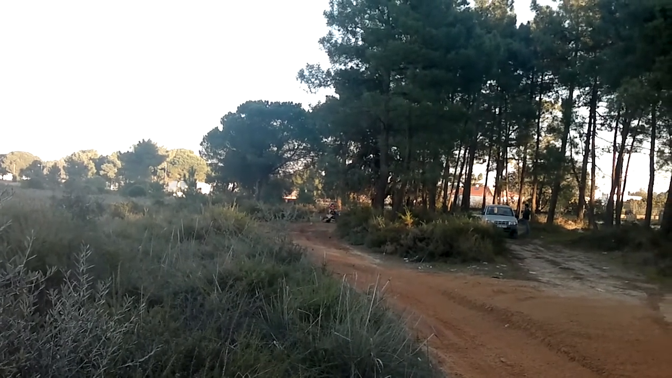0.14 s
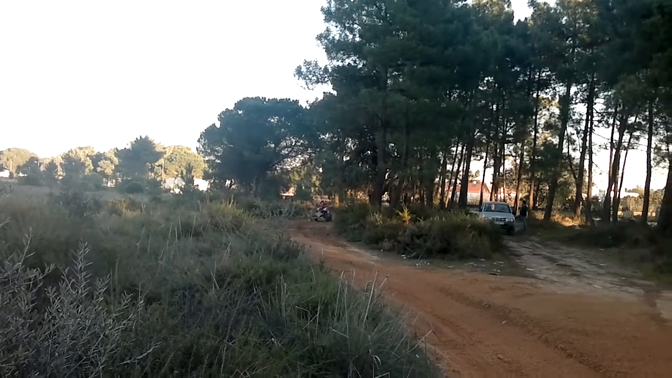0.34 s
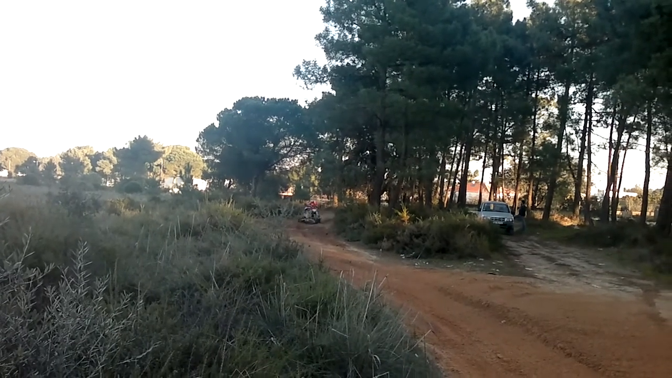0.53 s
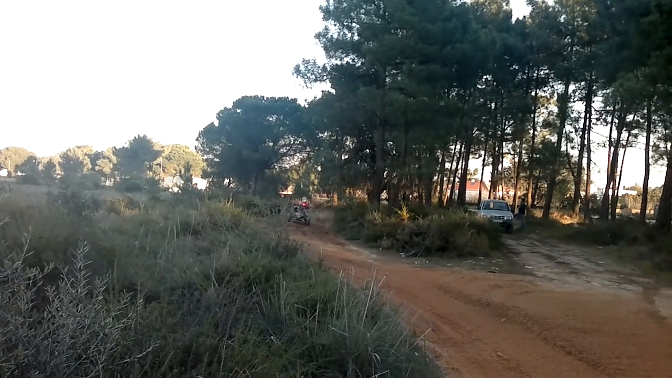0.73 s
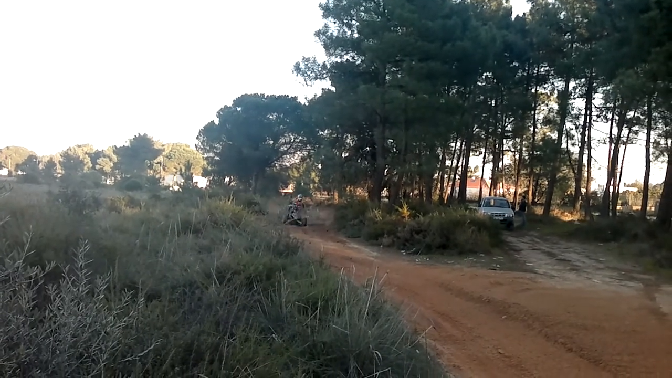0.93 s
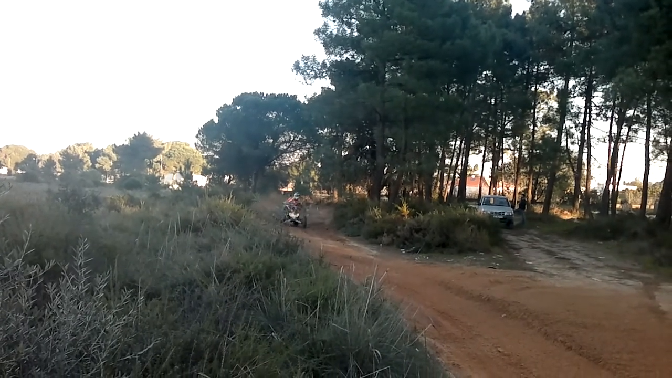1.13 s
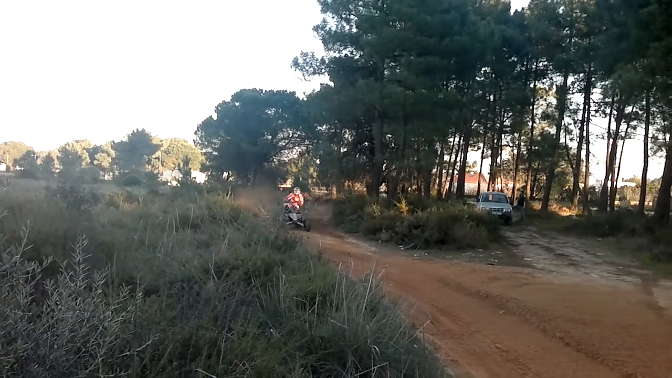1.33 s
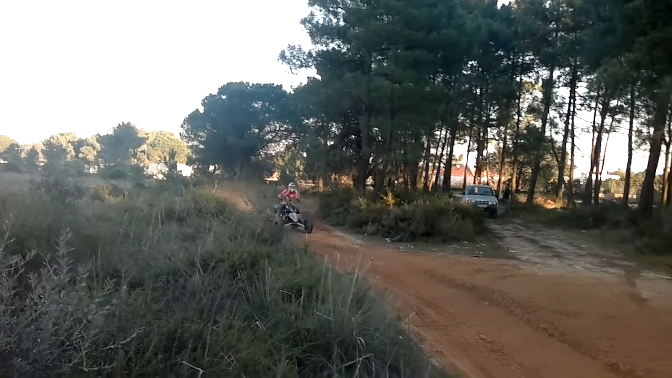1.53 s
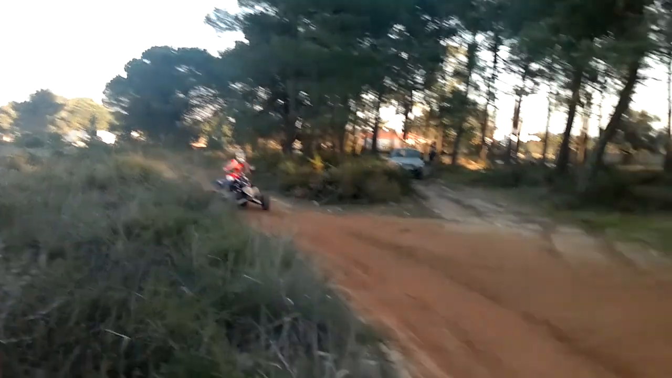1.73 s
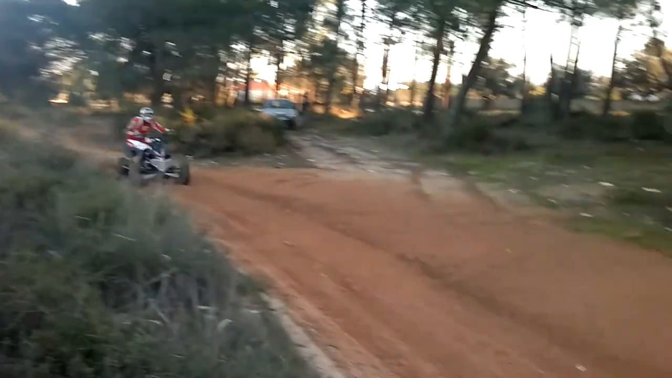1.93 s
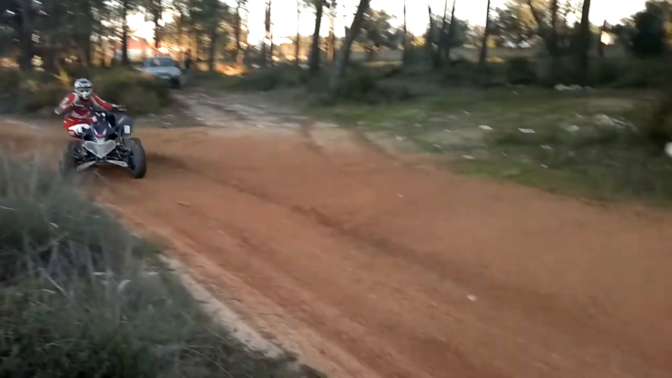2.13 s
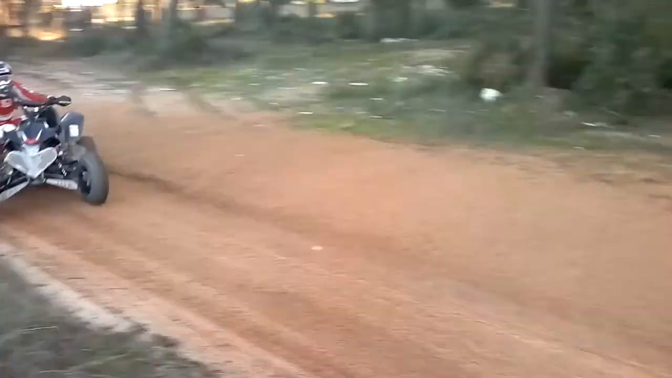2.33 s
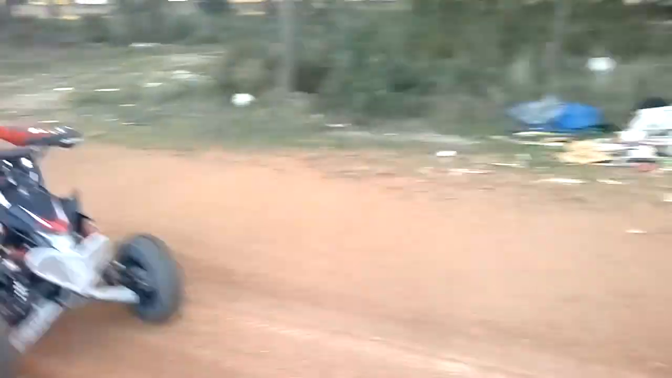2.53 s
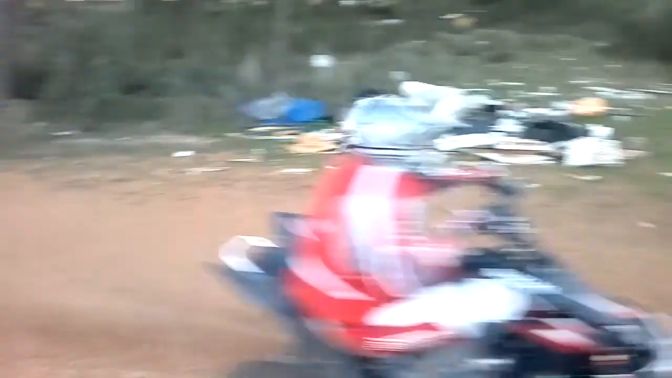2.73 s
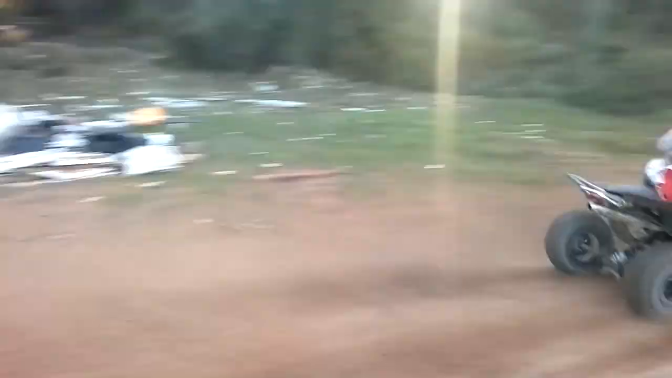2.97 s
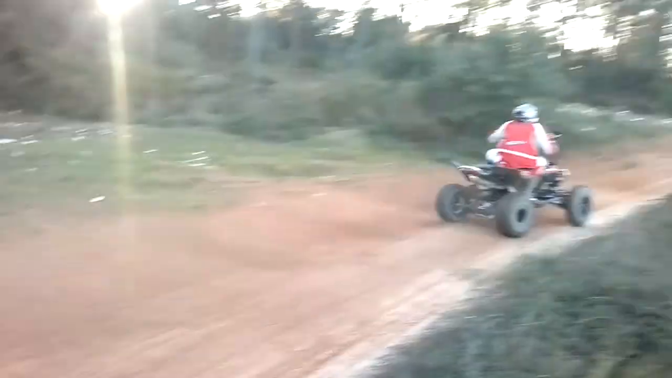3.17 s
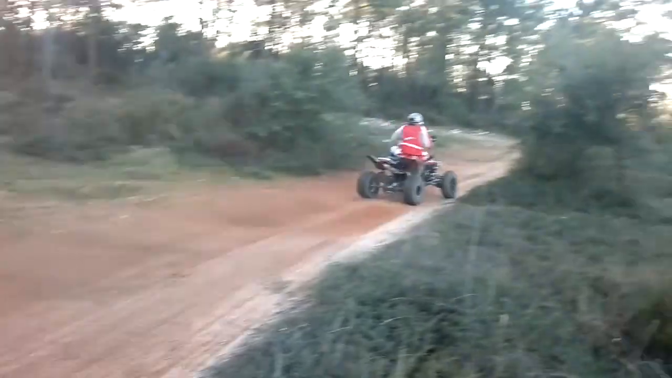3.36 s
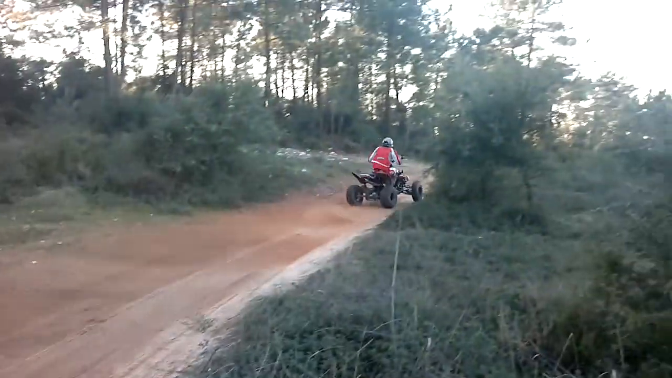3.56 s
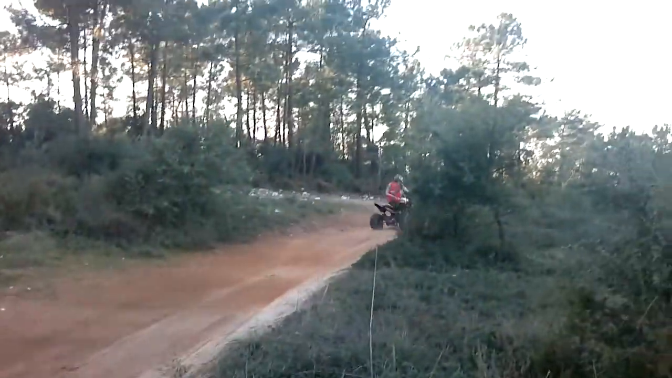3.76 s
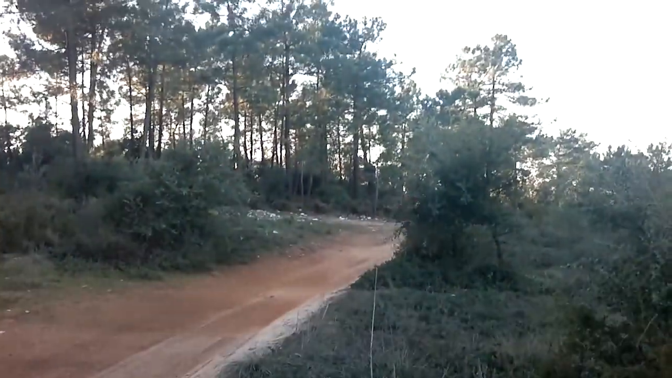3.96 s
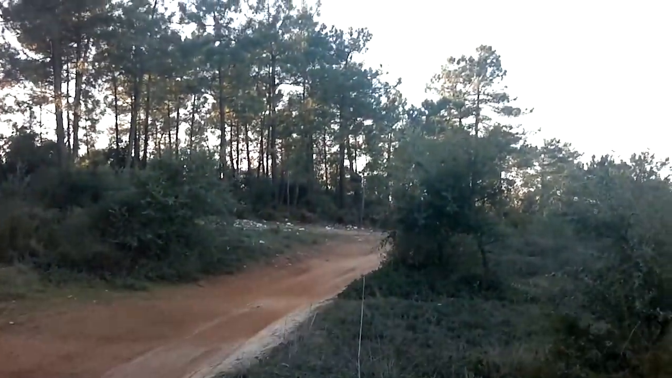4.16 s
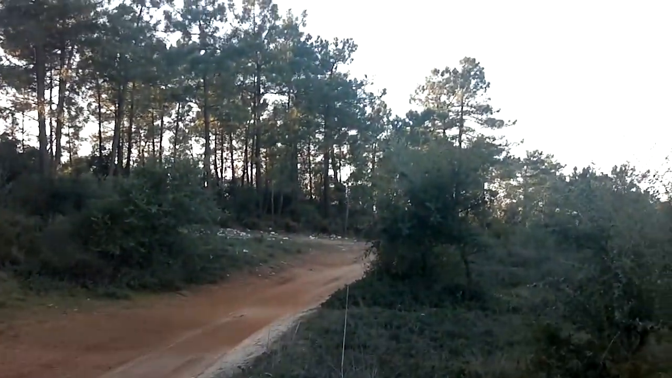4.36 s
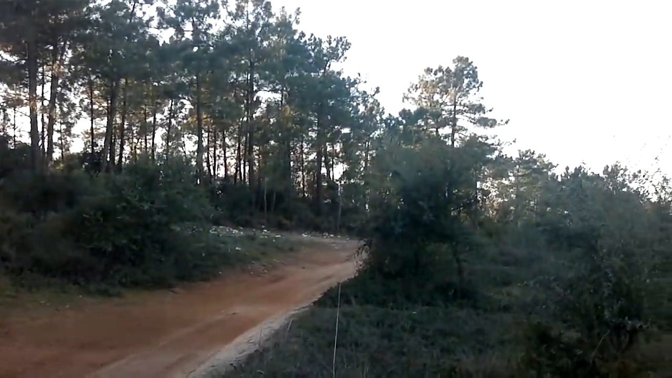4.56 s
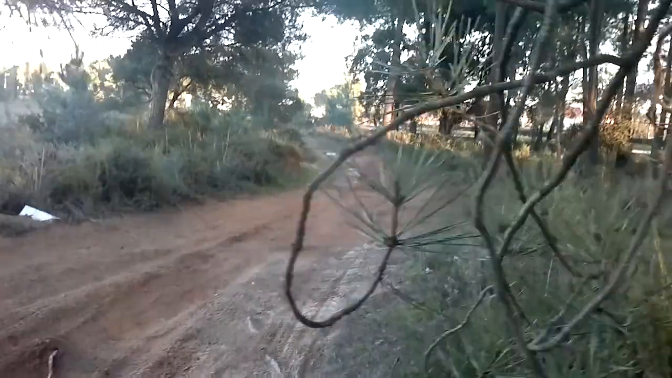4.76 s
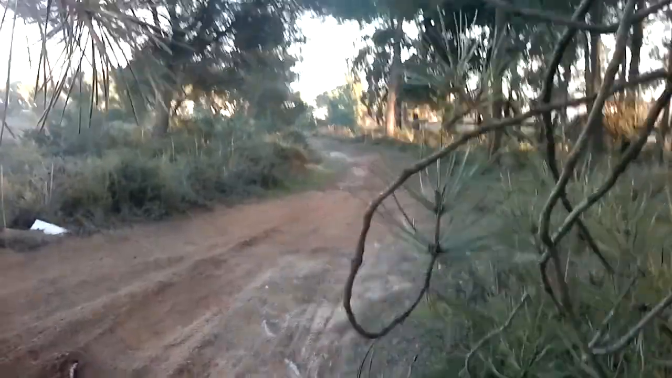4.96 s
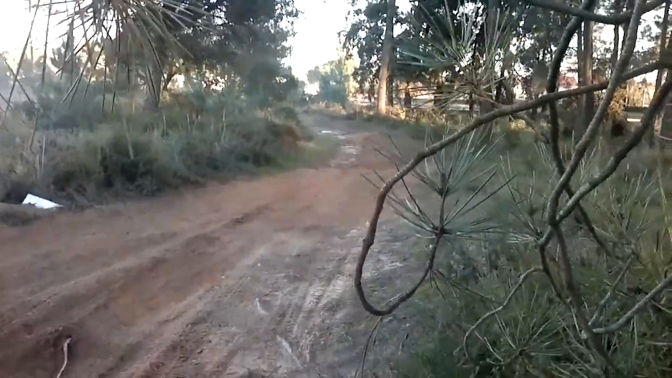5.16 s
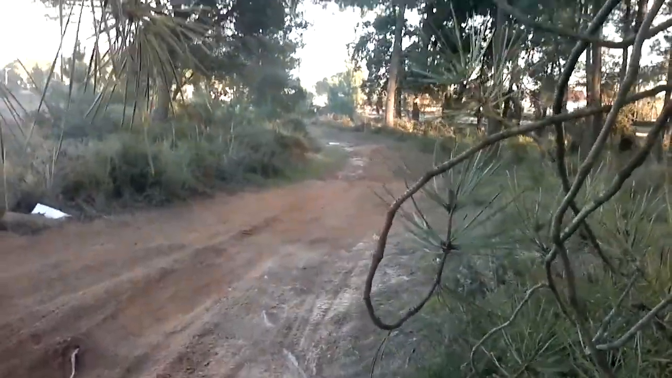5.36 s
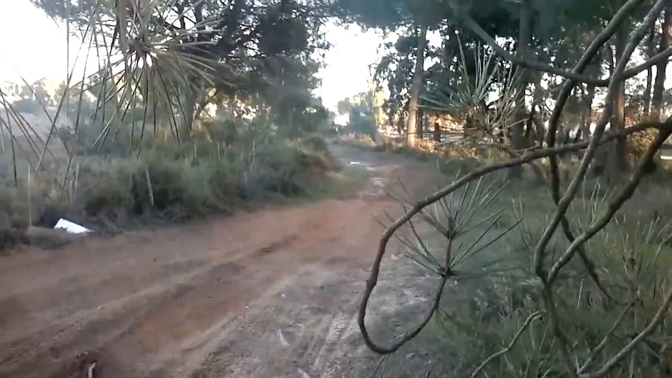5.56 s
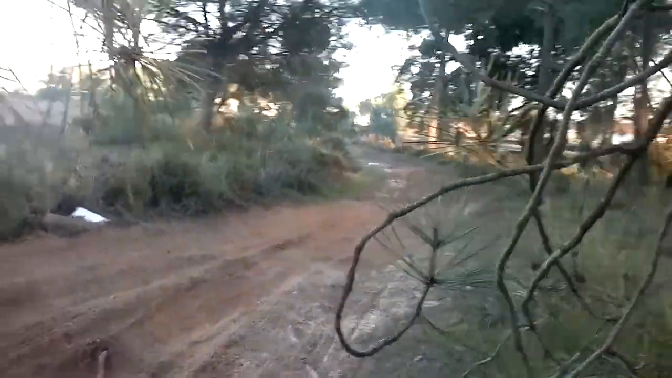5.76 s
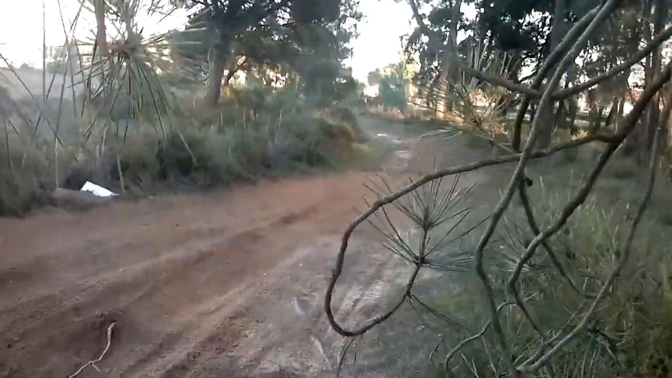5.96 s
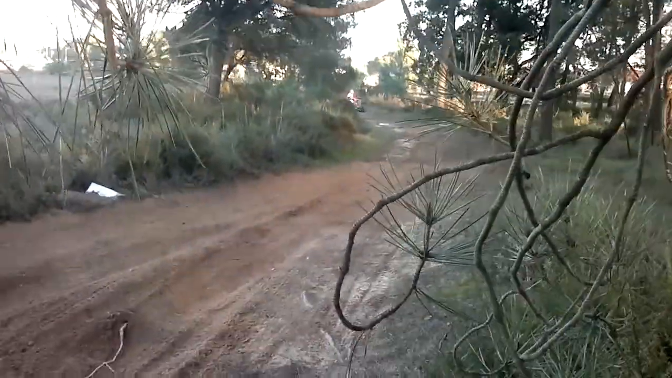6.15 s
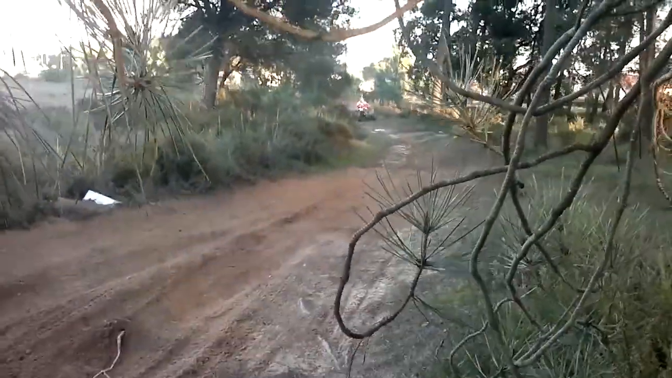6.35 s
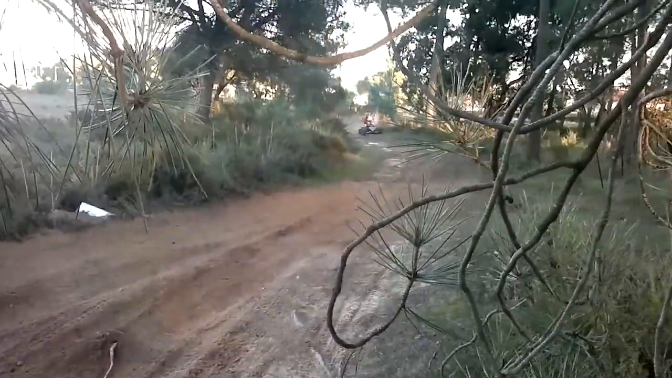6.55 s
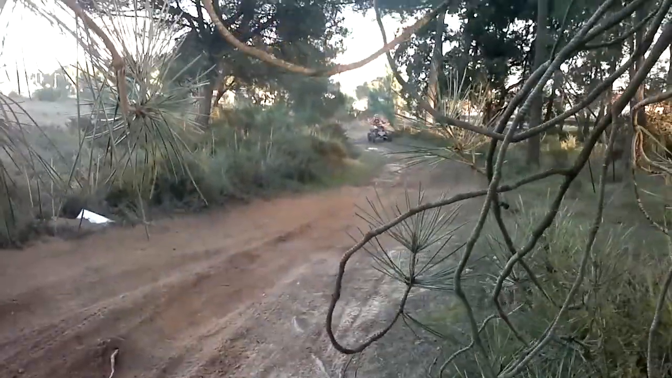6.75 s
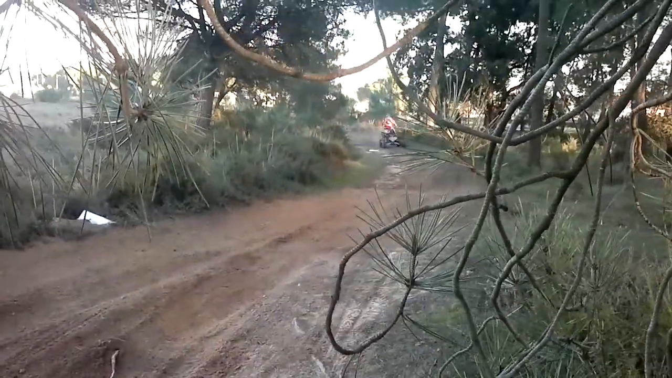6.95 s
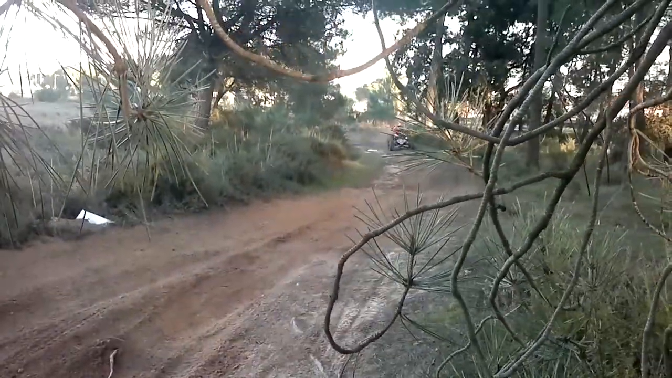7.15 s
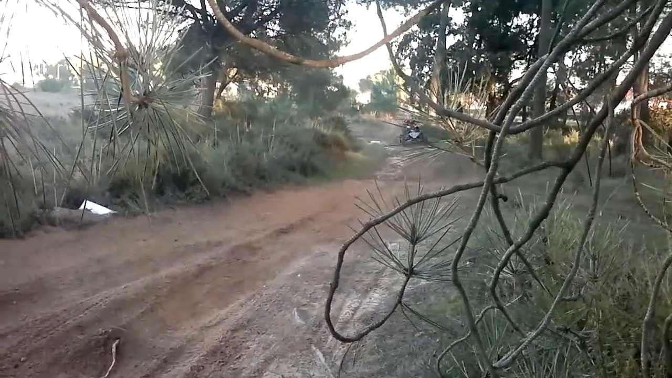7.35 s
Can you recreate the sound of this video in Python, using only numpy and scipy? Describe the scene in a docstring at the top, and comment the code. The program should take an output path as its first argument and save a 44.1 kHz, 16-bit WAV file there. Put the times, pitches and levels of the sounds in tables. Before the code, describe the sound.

A sport quad's low, fast engine buzz comes up a track among trees, barking and rasping harder as it nears. The close pass is very loud, with ripping exhaust pops, clatter and low gusts thumping the handheld microphone. It rides away, duller behind a bush, with one last crackle. Sound drops out for an instant; then the quad returns, coasting hollowly and blipping its throttle, while twigs tick faintly nearby.

```python
"""A booming, rasping single-cylinder sport quad comes up a dirt track, passes under two metres away and rides off.
From the front, clean low orders, barks at each firing and pulsing noise make the boom, bark and rasp.
From behind, hard pops ring the exhaust pipe, buffet the two microphone ports and overload them softly.
After a short silence it approaches again, on and off the throttle, while twigs tick close by the left port."""
import sys
import numpy as np
from scipy import signal
from scipy.fft import rfft, irfft
from scipy.io import wavfile
from scipy.ndimage import uniform_filter1d, map_coordinates

SR = 44100
rng = np.random.default_rng(int(sys.argv[2]) if len(sys.argv) > 2 else 0)


def pcm_store(signal):
    """Save signal as 16-bit PCM."""
    levels = np.round(np.clip(np.atleast_2d(signal), -1, 1) * 32767)
    wavfile.write(sys.argv[1], SR, levels.astype(np.int16).T)


N = 330309
T = np.arange(N) / SR  # time (s)

# Engine speed on the first approach, riding away and on the second approach.
# Each row: time in seconds, firings a second.
FIRST_SPEED = [(0.0, 71.9), (0.05, 72.8), (0.08, 70.7), (0.14, 63.6), (0.22, 57.6), (0.28, 53.3),
               (0.28, 53.3), (0.33, 57.6), (0.48, 73.0), (0.5, 74.6), (0.58, 69.5), (0.7, 76.6),
               (0.72, 76.1), (0.76, 74.8), (1.05, 71.7), (1.18, 80.8), (1.19, 80.3), (1.27, 71.0),
               (1.28, 71.1), (1.35, 76.2), (1.38, 77.0), (1.48, 76.6), (1.55, 75.3), (1.64, 76.3),
               (1.91, 69.9), (2.07, 73.7), (2.19, 81.3), (2.26, 79.6), (2.52, 71.7), (2.76, 73.4)]
AWAY_SPEED = [(2.66, 65.56), (2.74, 76.27), (2.92, 70.23), (3.27, 65.79), (3.45, 68.36), (3.68, 68.2),
              (3.8, 72.61), (3.92, 68.85), (3.98, 59.69), (4.08, 62.6), (4.12, 53.56), (4.57, 54.65),
              (4.63, 59.84), (4.72, 53.32)]
SECOND_SPEED = [(4.95, 76.42), (5.1, 74.95), (5.19, 76.55), (5.4, 58.3), (5.68, 57.53), (5.87, 64.28),
                (6.06, 59.88), (6.2, 52.68), (6.36, 48.77), (6.6, 49.8), (6.69, 60.04), (6.85, 50.24),
                (7.12, 81.05), (7.2, 68.99), (7.33, 59.36), (7.4, 64.97), (7.49, 56.05)]
# Twists of the throttle. Each row: opened in seconds, shut in seconds, opening 0-1.
THROTTLE = [(-.2, 0.13, 0.94), (.335, 3.945, 1), (4.092, 4.712, 1), (4.8, 5.22, 0.99), (5.72, 6.04, 0.4),
            (6.615, 6.72, 1), (6.85, 7.54, 0.6)]
# Full-throttle levels of each approach, before its overall trims. Each row: time in seconds, boom in dB,
# upper orders relative to it in dB, bark in dB, rasp in dB.
FIRST_LEVELS = [(0, -17, -2, -23, -23), (1.0, -14.5, -1, -27.5, -22.5), (1.55, -15.5, 0, -24, -22.5),
                (1.9, -14, -0.5, -22, -21), (2.22, -12, 3.5, -22, -22.5), (2.5, -16.5, 12, -21, -25.5),
                (2.74, -13, 2, -17.5, -21)]
SECOND_LEVELS = [(4.95, -11, -19, -28, -31), (5.199, -14, -16, -28.5, -32), (5.55, -16, -18, -29.5, -31),
                 (5.9, -17, -9, -29, -37), (6.11, -18.5, -6, -29.5, -39), (6.15, -12.5, -5.5, -32.5, -37.5),
                 (6.6, -12.5, -2.5, -34, -41.5), (6.66, -17, -0.5, -28.5, -42),
                 (7.04, -12.5, 3, -24, -30.5), (7.17, -10, 3, -23, -26), (7.24, -17, 5.5, -23, -26),
                 (7.31, -12.5, 4.5, -23.5, -26.5), (7.49, -13.5, 4, -22.5, -26.5)]
# Colours of the exhaust bark, far then nearer, and of the engine's rasp. Each row: frequency in Hz, gain in dB.
FIRST_FAR_BARK = [(220, -48), (380, -5.5), (500, -0.5), (650, 3), (730, -14), (776, -22), (918, -5),
                  (1190, -2.5), (1440, 0.5), (1900, -19), (2470, -51), (4180, -120)]
FIRST_NEAR_BARK = [(220, -35), (380, -1), (404, -13), (643, 3), (697, -10.5), (1180, -1.5), (1470, -13),
                   (1690, -20), (1900, -22), (2470, -27), (4180, -120)]
FIRST_RASP = [(1000, -7), (1500, -3), (1800, -3.5), (2100, -7.5), (2450, -2), (2950, 0), (3600, -3),
              (4200, -8.5), (5300, -15.5), (6200, -24), (8000, -27.5), (11500, -48.5), (13000, -75.5)]
SECOND_FAR_BARK = [(220, -40), (380, -18), (450, -17.5), (536, 0), (651, -3), (842, -6.5), (1000, -3),
                   (1280, -7), (1470, -2.5), (1700, -39), (2210, -51), (3740, -120)]
SECOND_NEAR_BARK = [(220, -27.5), (380, -7), (457, 3.5), (704, -1), (878, -4), (1010, 2), (1180, -0.5),
                    (1710, -20), (2200, -25.5), (2860, -36), (4840, -120)]
SECOND_RASP = [(1000, -4), (1500, 5), (2000, 3), (2600, -5), (3500, -2.5), (4100, -5.5), (4700, -10),
               (5600, -13.5), (6800, -25.5), (9500, -38.5), (13000, -70.5)]
# The airbox booms with the orders near its resonance; coasting narrows this to a hollow drone.
# Each row: frequency in Hz, gain in dB.
AIRBOX = [(48, -17), (60, -8.5), (74, -10), (100, -13.5), (118, -1.5), (140, -.5), (160, 1), (175, -10.5),
          (197, -10.5), (225, -12.5), (290, -11.5), (325, -14.5), (370, -28.5), (550, -39)]
COAST_BOOM = [(48, -23.5), (60, -5.5), (98, -12.5), (116, -5), (148, 0), (174, -1.5), (198, -3),
              (225, -11.5), (250, -16.5), (300, -20), (420, -34.5)]
# Ground and brush easily screen the upper orders. In the pair: where they begin in Hz, where wholly so in Hz.
UPPER_HZ = (169.4, 241)
# The engine stumbles as its revs collapse. Each row: centre in seconds, length in seconds, flutter in dB.
STUMBLES = [(7.24, .05, -1), (7.39, .07, -4)]
# Swells of clean resonance rung by the firings: mostly the intake's howl, with a short chirp at 5.66 s
# and a bright ring at 7.25 s. Each row: peak in seconds, length in seconds, resonance in Hz, width in Hz,
# level in dB.
FIRST_HOWLS = [(.1, .07, 1450, 250, -27), (1.0, .5, 620, 140, -29.5), (1.1, .6, 500, 130, -34),
               (1.3, .25, 1280, 380, -26), (1.86, .17, 1100, 330, -20.5), (2.14, .12, 590, 180, -26.5),
               (2.22, .1, 1680, 220, -24.5), (2.33, .17, 1080, 280, -23.5), (2.65, .06, 900, 320, -18.5)]
SECOND_HOWLS = [(5.08, .15, 1000, 200, -26), (5.15, .25, 1450, 260, -33), (5.5, .15, 1950, 400, -39),
                (5.66, .014, 2080, 250, -33), (5.87, .12, 980, 220, -29), (6.71, .06, 1150, 400, -30),
                (7.0, .09, 1130, 260, -23), (7.25, .12, 3400, 800, -32), (7.35, .13, 1500, 450, -26)]
# The ground echo hollows out bark and rasp near the pass. Each row: frequency in Hz, gain in dB.
HOLLOW = [(1100, 1.5), (1600, -4.5), (2200, -5.5), (3000, -3), (4500, 2)]
# Exhaust pipe modes of every pop, those hard pops add, and the intake's modes.
# Each row: frequency in Hz, width in Hz, relative level left in dB, right in dB.
PIPE_LOW = [(260, 170, 3, -5), (655, 210, -0.5, 3), (1367, 224, -0.5, 3.5), (1936, 350, -1, -1.5),
            (2700, 406, 5.5, -7)]
PIPE_HIGH = [(3265, 780, 8, -5), (4030, 360, 2, -3), (5130, 180, -22.5, -18)]
INTAKE = [(424, 230, 1, 1), (710, 360, 0.94, 2)]
# Cracks of the exhaust: one as the throttle opens, a longer one just before it shuts.
# Each row: centre in seconds, extra bite in dB, length in seconds.
CRACKS = [(4.127, 18, 0.023), (4.667, 18.5, 0.097)]
# Swells of the intake's growl under load. Each row: peak in seconds, level in dB, rise in seconds, fall in seconds.
GROWLS = [(2.83, -14.5, 0.064, .15), (4.675, -23, 0.073, 0.025)]
# Gusts of exhaust on the microphone. Each row: start in seconds, end in seconds, relative level in dB.
GUSTS = [(2.762, 3.03, -6.5), (3.04, 3.342, -5.5), (3.356, 3.603, -5.5), (3.694, 3.778, -10)]
# Colours of the gusts' rumble and of the engine's clatter. Each row: frequency in Hz, gain in dB.
RUMBLE = [(5, -36), (20, -16), (35, -3), (70, -2), (170, -6.5), (400, -15), (900, -37), (3000, -41),
          (9000, -46.5)]
CLATTER = [(250, -32), (420, 5), (900, -5), (1400, -2), (1900, -4), (2200, -10.5), (3000, -3), (4200, -7.5),
           (6000, -17.5), (9000, -29.5), (12000, -49), (14000, -69.5)]
# How engine noise falls on the two ports. Each row: frequency in Hz, left over right in dB.
BALANCE_DB = [(150, 2), (600, 0.5), (1100, -3.5), (1600, -2), (2300, 4), (3100, 11.5), (4100, 8),
              (6000, 14.5), (8500, -3.5), (12000, -30)]
# Each row: frequency in Hz, likeness of the ports 0-1.
LIKENESS = [(200, 0.94), (700, 0.93), (1100, 0.85), (1600, 0.11), (2400, 0.14), (6000, 0.064)]
# Twig ticks. Each row: time in seconds, relative level in dB.
TWIGS = [(5.139, -11), (5.382, -37), (5.639, -23), (5.849, -14.5)]
# The silence between the two passages. In the pair: start in seconds, end in seconds.
SILENCE = (4.735, 4.93)

# level changes with the throttle shut (dB)
SHUT_BOOM_DB, SHUT_BARK_DB, SHUT_RASP_DB = -3.5, -4.5, -8
SHUT_POP_DB, SHUT_BITE_DB, SHUT_CLATTER_DB = -17, -35, -8
# when the tyres grip and drag the revs under their running mean, the engine barks and rasps harder
LUG_MEAN_S, LUG_DB_PER_HZ = 0.21, 0.2
COAST_OPENING, COAST_FLUTTER_DB = 0.47, -15  # coasts under this opening; flutter of its uneven firings
HOLLOW_S, HOLLOW_LENGTH_S = 2.55, .14
PORT_LAG_S = .00014  # the howl reaches the right port later
PASS_S, PASS_M, SPEED_M_PER_S = 2.785, 1.77, 10.3  # the pass: moment, nearest distance, speed
# base levels from behind, and the share of the spreading loss on the upper pipe modes as the pipe turns to face back
POP_DB, BITE_DB, CLATTER_DB, BITE_SPREAD = -19, -12, -13.5, 0.23
TURN_START_S, TURN_END_S, SIDEWAYS_DB = 2.68, 3.094, -17  # the exhaust swings into line; level change before
SIDE_START_S, SIDE_END_S, CLATTER_FRONT_DB = 2.74, 2.82, -10  # the engine's side goes by; clatter change before
BUSH_START_S, BUSH_END_S, BUSH_DB = 3.807, 4.237, -27  # a bush comes to screen the upper modes
ROUGH_NEAR, ROUGH_FAR = 1, .02  # roughness of the pops 0-1
ECHO_CHANGES_PER_S = 1.3  # how fast the echo pattern changes as the quad moves
EDGE_HZ = 15600  # band limit


def approach(speed, levels, howls, far_bark, near_bark, near, rasp_colour, rough,
             echo_db, rasp_steady, boom_db, bark_db, rasp_db):
    """The quad from the front: revs and throttle drive its low orders, barks, rasp and howl."""
    hz, = curves(speed)
    boom_level, upper_db, bark_level, rasp_level = curves(levels)
    throttle = held(THROTTLE, attack_s=0.092, release_s=0.088)  # the intake follows slowly
    lug_db = LUG_DB_PER_HZ * throttle * (uniform_filter1d(hz, int(LUG_MEAN_S * SR)) - hz)
    coast = np.clip(1 - throttle / COAST_OPENING, 0, 1)
    boom_level = boom_level + SHUT_BOOM_DB * (1 - throttle)
    bark_level = bark_level + SHUT_BARK_DB * (1 - throttle) + lug_db
    rasp_level = rasp_level + SHUT_RASP_DB * (1 - throttle) + lug_db

    turns = np.cumsum(hz * (1 + .003 * wander(40))) / SR  # counts firings
    age = turns % 1 / hz  # seconds since the last firing
    clicks, strength = firings(turns, spread_db=0.7)
    boom, second_order_db = boom_orders(turns, hz, boom_level, upper_db, coast)
    flutter, burble = uneven_puffs(age)
    uneven = coast * amp(COAST_FLUTTER_DB)
    uneven = uneven + sum(amp(db) * np.exp(-((T - s) / length) ** 2) for s, length, db in STUMBLES)
    low = amp(boom_db) * boom + amp(second_order_db - 16.0) * flutter + uneven * amp(boom_level) * burble

    bark = exhaust_bark(clicks, strength, age, rough, echo_db, far_bark, near_bark, near)
    rasp = engine_rasp(strength, age, rasp_level, rasp_steady, rasp_colour, near)
    roar = amp(bark_level + bark_db) * bark + amp(rasp_level + rasp_db) * rasp
    hollow = np.exp(-((T - HOLLOW_S) / HOLLOW_LENGTH_S) ** 2)
    return low + howl(clicks, howls) + (1 - hollow) * roar + hollow * colour(roar, HOLLOW)


def boom_orders(turns, hz, boom_level, upper_db, coast):
    """Six sine orders of the firing rate, weighted by the airbox; also returns the second one's level."""
    boom = 0
    for k in range(1, 7):
        resonance_db = (1 - coast) * read(AIRBOX, k * hz) + coast * read(COAST_BOOM, k * hz)
        order_db = boom_level + resonance_db + upper_db * np.interp(k * hz, UPPER_HZ, [0, 1])
        if k == 2:
            second_order_db = order_db
        phase = 2 * np.pi * k * turns - 0.48 * (k - 1) ** 2  # the airbox delays higher orders
        boom = boom + amp(order_db + 1.3 * wander(35)) * np.sin(phase)
    return np.sqrt(2) * boom * amp([[.7], [-.7]]), second_order_db


def uneven_puffs(age):
    """Low noise puffed out at each firing: a broad flutter and its narrower burble."""
    flutter_colour = [(25, -23.0), (70, -7.5), (170, -2.5), (330, -14), (500, -16.0), (1200, -72.0)]
    flutter = evened(colour(ports(puffs(age, 0.0027, 0.63)), flutter_colour))
    burble_colour = [(90, -36.5), (140, -1.0), (185, -2), (260, -22.5), (500, -48.5)]
    return flutter, evened(colour(flutter, burble_colour))


def exhaust_bark(clicks, strength, age, rough, echo_db, far_bark, near_bark, near):
    """Clicks and rough puffs, with echoes off the trunks, take the colour of the exhaust."""
    rough_puffs = evened(strength * puffs(age, 0.0014, 0.065))
    drive = np.sqrt(1 - rough) * evened(clicks) + np.sqrt(rough) * rough_puffs
    echoes = trees(drive, .22)
    drive = ports(drive + amp(echo_db) * (1 - 0.13 * near) * echoes)  # nearer is drier
    far = evened(colour(drive, far_bark))
    close = evened(colour(drive, near_bark))
    return evened((1 - near) * far + near * close)


def engine_rasp(strength, age, rasp_level, rasp_steady, rasp_colour, near):
    """Noise pulsing with the firings, with more treble as it nears."""
    steady = rasp_steady * amp(-.6 * (rasp_level + 20.0))  # under load the rasp gathers into pulses
    rasp = evened(colour(ports(strength * puffs(age, 0.00085, steady) / (steady + .3)), rasp_colour))
    near_treble = [(1800, -22.5), (3500, -6.0), (5200, -4.5), (7500, 0.0), (12000, -7.5)]
    return rasp + near ** 2 * colour(rasp, near_treble)


def howl(clicks, swells):
    """Each firing rings a resonance, mostly the intake's: clean harmonics glide through it with the revs."""
    left = 0
    for s, length, hz, width, db in swells:
        swell = amp(db) * np.exp(-((T - s) / length) ** 2 / 2)
        left = left + swell * pipe(clicks[None], [(hz, width, 0, 0)])[0]
    return np.array([left, np.interp(T - PORT_LAG_S, T, left)])


def departure():
    """The quad from behind: pops ring the open pipe over the clatter of the engine."""
    hz, = curves(AWAY_SPEED)
    shut = 1 - held(THROTTLE, attack_s=0.016, release_s=0.016)  # the exhaust follows fast
    closeness = PASS_M / np.hypot(PASS_M, SPEED_M_PER_S * (T - PASS_S))
    spread_db = 20 * np.log10(closeness)
    aim_db = SIDEWAYS_DB * (1 - ramp(TURN_START_S, TURN_END_S))
    crack_db = sum(db * np.exp(-((T - s) / length) ** 2) for s, db, length in CRACKS)
    pop_db = POP_DB + aim_db + SHUT_POP_DB * shut
    bite_db = BITE_DB + aim_db + BITE_SPREAD * spread_db + SHUT_BITE_DB * shut
    bite_db = bite_db + BUSH_DB * ramp(BUSH_START_S, BUSH_END_S) + crack_db
    clatter_db = CLATTER_DB + spread_db + SHUT_CLATTER_DB * shut
    clatter_db = clatter_db + CLATTER_FRONT_DB * (1 - ramp(SIDE_START_S, SIDE_END_S))
    rough = np.clip(ROUGH_FAR + (ROUGH_NEAR - ROUGH_FAR) * closeness, 0, 1)

    turns = np.cumsum(hz * (T > AWAY_SPEED[0][0])) / SR
    age = turns % 1 / hz
    clicks, strength = firings(turns, spread_db=.8)
    pops = exhaust_pops(clicks, strength, turns, age, rough, pop_db, bite_db)
    echoes = amp(-19) * trees(pops, .3)
    clatter = amp(clatter_db) * evened(colour(ports(puffs(age, 0.0034, 0.65)), CLATTER))
    drone = exhaust_drone(turns, closeness, shut)
    close = buffet(turns, age, start_hz=1789, slow_s=.0035, swirl_db=-2.5, rumble_db=-10.0)
    return (pops + echoes + clatter + drone + growl(clicks)) * ramp(2.64, 2.68) + close


def exhaust_pops(clicks, strength, turns, age, rough, pop_db, bite_db):
    """Firings and jets of gas ring the pipe's low and high modes, with a pressure blast and hissing spit."""
    # a rough pop also lasts longer
    jet = evened(strength * puffs(age, 0.00058 + 0.0021 * rough, 0.024, sharp=2.8) * (turns > 1))
    drive = np.sqrt(1 - rough) * evened(clicks) + 2.1 * np.sqrt(rough) * jet
    low, high = pipe(drive[:1], PIPE_LOW), pipe(drive, PIPE_HIGH)
    spit_colour = [(1500, -44.5), (4000, 11), (7000, -18), (11000, -24.5), (15000, -45)]
    spit = evened(colour(jet, spit_colour)) * amp([[3], [-3]])
    body = amp(-4.0) * low + amp(-7.5) * blast(clicks, swing_hz=157, decay_s=0.0023)
    bite = amp(-4.5) * high + amp(-25.5) * spit
    return amp(pop_db) * body + amp(bite_db) * bite


def pipe(drive, modes):
    """Pipe modes that swell and die within a few milliseconds."""
    t = np.arange(1024) / SR
    ring = 0
    for hz, width, left_db, right_db in modes:
        u = 1.5 * np.pi * width * t
        ring = ring - amp([[left_db], [right_db]]) * u * np.exp(-u) * np.sin(2 * np.pi * hz * t) * width
    return evened(signal.oaconvolve(drive, ring, axes=1)[:, :N])


def blast(clicks, swing_hz, decay_s):
    """The pressure wave of each firing: a sharp spike and a slower swing back."""
    t = np.arange(1024) / SR
    flow = np.sin(2 * np.pi * swing_hz * t) * np.exp(-t / decay_s) * (1 - np.exp(-t / 0.00081))
    return evened(signal.oaconvolve(clicks, -np.gradient(flow))[:N])


def buffet(turns, age, start_hz, slow_s, swirl_db, rumble_db):
    """Each slug of gas hits each port differently, as an eddy that starts fast and slows."""
    size = amp(4.3 * rng.standard_normal((2, 2000)))[:, turns.astype(int)]  # scales the eddy's pitch
    unsteady = np.exp(.35 * np.array([wander(400), wander(400)]))
    eddy_hz = size * (start_hz * np.exp(-age / slow_s) + 70) * unsteady
    swirl = np.sin(2 * np.pi * np.cumsum(eddy_hz, axis=1) / SR)
    swirl = swirl * np.exp(-age / 0.016) / np.sqrt(size)  # slow eddies are large
    rumble = colour(rng.standard_normal((2, N)), RUMBLE)
    rumble = rumble * (1 + 0.69 * ramp(3.06, 3.6)) * amp(3.4 * wander(18))  # the wake grows later, in lumps
    gust = amp(swirl_db) * evened(swirl) * amp([[1], [-1]]) + amp(rumble_db + 4.0) * evened(rumble)
    rows = [(start, end, amp(db)) for start, end, db in GUSTS]
    return held(rows, attack_s=0.041, release_s=0.066) * gust


def exhaust_drone(turns, closeness, shut):
    """Four low orders of the firing rate, with phases that wander more close by."""
    slip = .06 + .2 * closeness
    drone = 0
    for k, db in enumerate([-29.5, -26.5, -32, -28.5], 1):
        drone = drone + amp(db) * np.cos(2 * np.pi * (k * turns + slip * wander(25) - .5))
    return drone * amp(-3 * shut)


def growl(clicks):
    """Firings ring the intake's modes in swells under load."""
    load = 0
    for s, db, rise, fall in GROWLS:
        load = load + amp(db) * np.exp(-np.maximum((s - T) / rise, (T - s) / fall))
    return load * pipe(clicks[None], INTAKE)


def trees(x, t60, count=3):
    """Scattered echoes from the trunks, different at each port; one set of trunks gives way to the next."""
    t, out = np.arange(SR // 4) / SR, 0
    for k in range(count):
        scatter = rng.standard_normal((2, len(t))) * (rng.random((2, len(t))) < 1500 / SR)
        taps = scatter * amp(-60 * t / t60) * (t > .008)
        taps = taps / np.linalg.norm(taps, axis=1)[:, None]
        share = np.sqrt(2 / count) * np.cos(np.pi * (ECHO_CHANGES_PER_S * T + k / count))
        out = out + signal.oaconvolve(share * x * np.ones((2, 1)), taps, axes=1)[:, :N]
    return out


def twigs():
    """Dry ticks beside the left port: noise that dies within a few milliseconds."""
    t, out = np.arange(1000) / SR, np.zeros((2, N))
    for s, db in TWIGS:
        tick = amp(db) * np.exp(-t / 0.00082) * rng.standard_normal((2, len(t)))
        out[:, round(s * SR):][:, :len(t)] += tick
    tick_colour = [(300, -19), (3000, -4), (5500, 9.5), (8000, -9), (15000, -40)]
    return colour(out, tick_colour) * amp([[3], [-14]])


def breeze():
    """Faint low air noise on both ports."""
    air_colour = [(15, 2.5), (35, -4.5), (90, 6.5), (400, -21.5), (2000, -65.0)]
    return amp(-39.5) * evened(colour(rng.standard_normal((2, N)), air_colour))


def firings(turns, spread_db):
    """A click at each whole turn, and the uneven strength of each firing."""
    cycle = np.floor(turns).astype(int)
    strength = amp(spread_db * rng.standard_normal(2000))[cycle]
    return np.diff(cycle, prepend=0) * strength, strength


def puffs(age, length_s, steady, sharp=1):
    """Two streams of noise that swell and die after each firing, over a steady share."""
    u = age / length_s
    return (steady + (u * np.exp(1 - u)) ** sharp) * rng.standard_normal((2, N))


def ports(pair):
    """Two unrelated sounds become left and right: alike in the bass, apart higher up, with a tilted balance."""
    a, b = rfft(pair)
    hz = np.fft.rfftfreq(N, 1 / SR)
    same = np.clip(read(LIKENESS, hz), 0, 1)
    lean = amp(read(BALANCE_DB, hz) / 2)
    left = a * lean
    right = (same * a + np.sqrt(1 - same ** 2) * b) / lean
    return irfft(np.array([left, right]), N)


def colour(x, points):
    """Causal minimum-phase filter with the given dB spectrum, floored at -100 dB."""
    hz = abs(np.fft.fftfreq(4096, 1 / SR))
    log_gain = np.log(amp(np.maximum(read(points, hz), -100)))
    taps = np.fft.ifft(np.exp(np.conj(signal.hilbert(log_gain)))).real[:2048]
    return signal.oaconvolve(np.atleast_2d(x), taps[None], axes=1)[:, :N]


def wander(per_s):
    """Smooth chance of size 1, with the given number of random points a second."""
    return evened(map_coordinates(rng.standard_normal(4000), [T * per_s], order=2, mode="wrap"))


def held(rows, attack_s, release_s):
    """Attack, hold and release for each row of (start, end, height)."""
    return sum(height * ramp(start, start + attack_s) * (1 - ramp(end, end + release_s))
               for start, end, height in rows)


def ramp(start, end):
    """Straight rise from 0 to 1 between two times."""
    return np.clip((T - start) / (end - start), 0, 1)


def curves(rows):
    """Each column of a table as a curve over time."""
    s, *columns = np.transpose(rows)
    return [np.interp(T, s, c) for c in columns]


def read(points, hz):
    """A spectrum table on a log-frequency axis."""
    f, value = np.transpose(points)
    return np.interp(np.log(hz + 1), np.log(f + 1), value)


def amp(db):
    """Decibels to amplitude."""
    return 10 ** (np.asarray(db) / 20)


def evened(x):
    """Scales a sound so that the mean of its channels has rms 1."""
    return x / np.sqrt(np.mean(np.atleast_2d(x).mean(0) ** 2) + 1e-20)


def scene():
    """Approach, pass and departure; a short silence; a second approach."""
    first = approach(FIRST_SPEED, FIRST_LEVELS, FIRST_HOWLS, FIRST_FAR_BARK, FIRST_NEAR_BARK,
                     near=ramp(1.5, 1.95), rasp_colour=FIRST_RASP, rough=.18, echo_db=7.0,
                     rasp_steady=0.87, boom_db=-0.5, bark_db=-4.0, rasp_db=-.5)
    second = approach(SECOND_SPEED, SECOND_LEVELS, SECOND_HOWLS, SECOND_FAR_BARK, SECOND_NEAR_BARK,
                      near=ramp(5.8, 6.5), rasp_colour=SECOND_RASP, rough=.34, echo_db=5.5,
                      rasp_steady=1.1, boom_db=0.0, bark_db=-0.5, rasp_db=4.0)
    stop, start = SILENCE
    before = first * (1 - ramp(2.695, 2.82)) + departure() + breeze()
    after = second + twigs() + breeze()
    return before * (1 - ramp(stop - .015, stop + 0.017)) + after * ramp(start, start + 0.023)


def record(dry):
    """The microphone overloads softly at full scale; then the band limit."""
    limited = dry / (1 + dry ** 10) ** (1 / 10)
    band = signal.firwin(255, EDGE_HZ, window=("kaiser", 8), fs=SR)
    return signal.oaconvolve(limited, band[None], "same", axes=1)


dry = scene()
out = record(dry)
pcm_store(out)
```